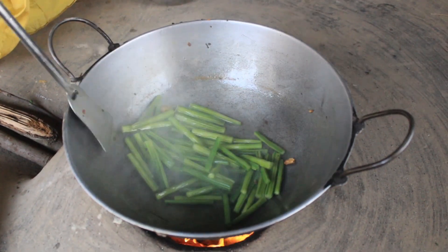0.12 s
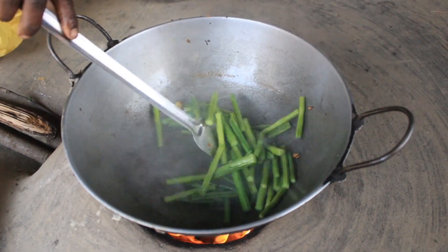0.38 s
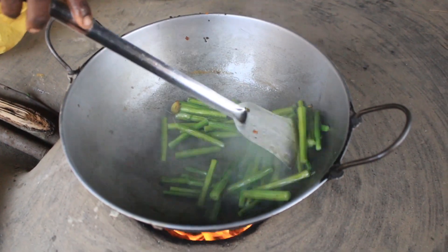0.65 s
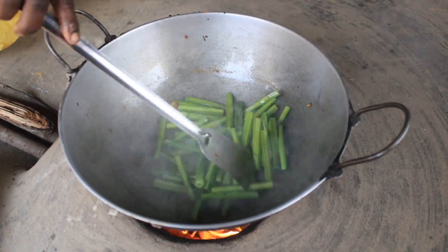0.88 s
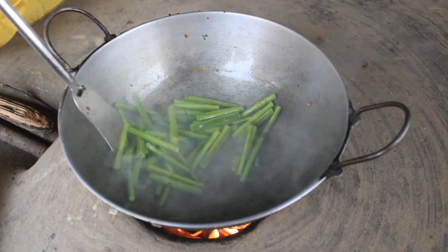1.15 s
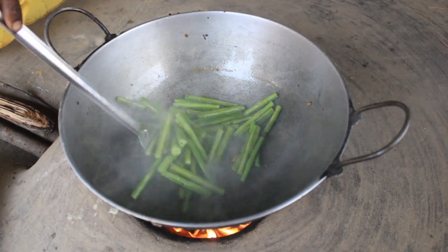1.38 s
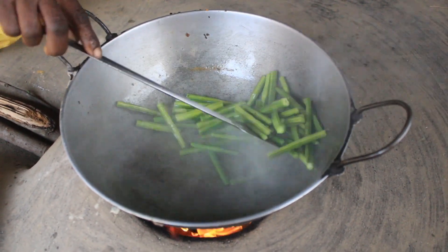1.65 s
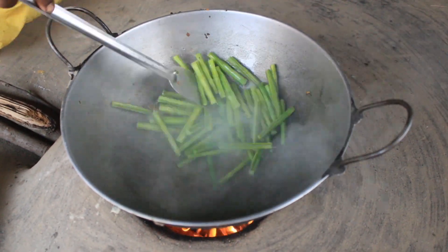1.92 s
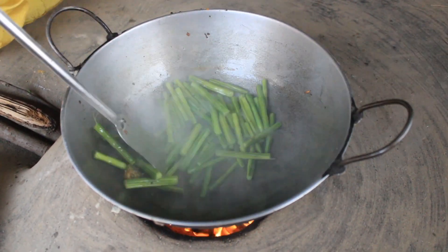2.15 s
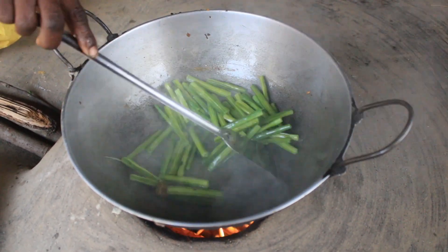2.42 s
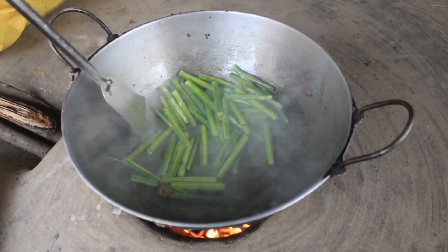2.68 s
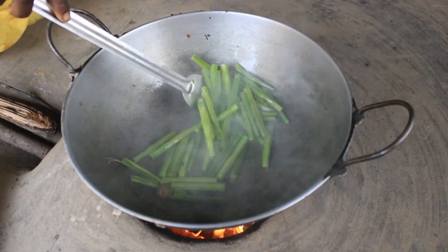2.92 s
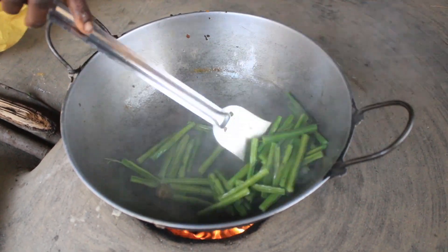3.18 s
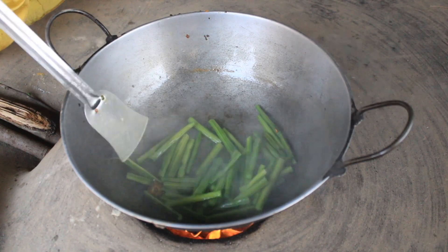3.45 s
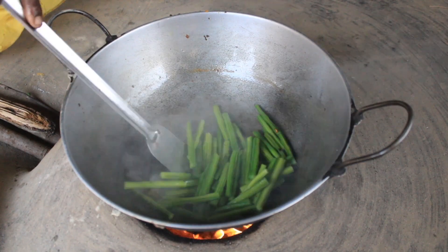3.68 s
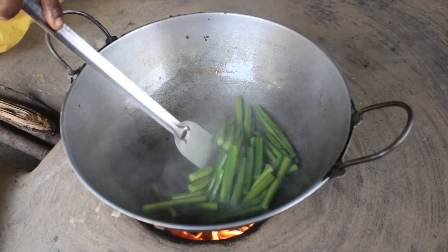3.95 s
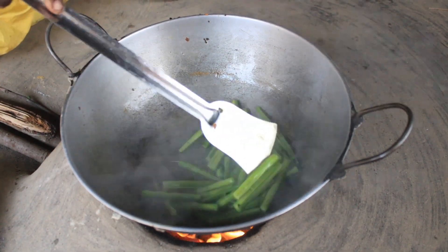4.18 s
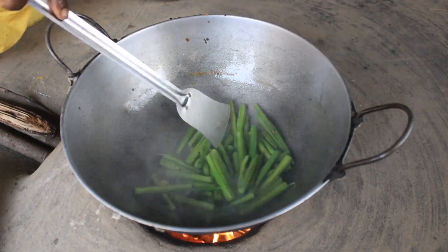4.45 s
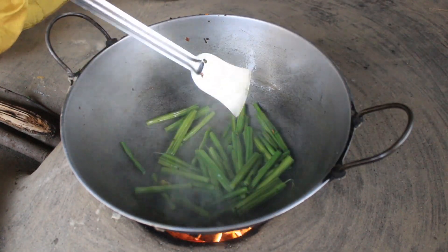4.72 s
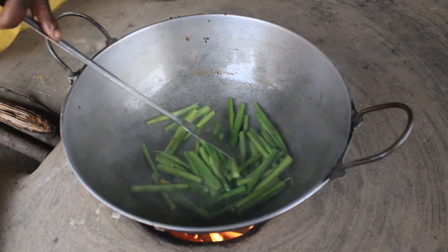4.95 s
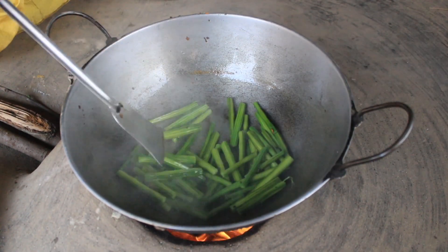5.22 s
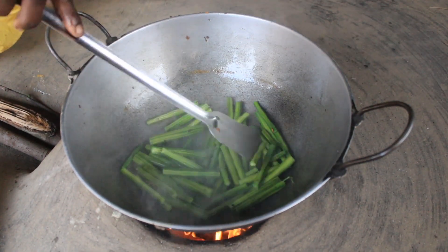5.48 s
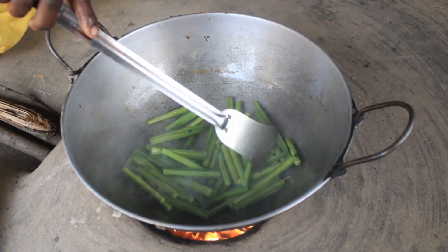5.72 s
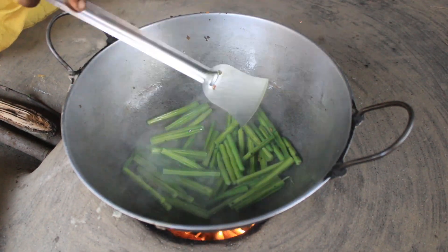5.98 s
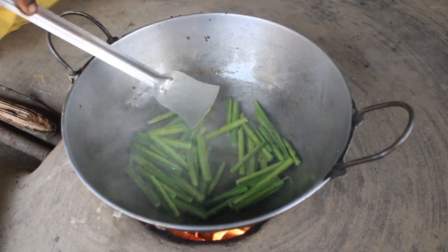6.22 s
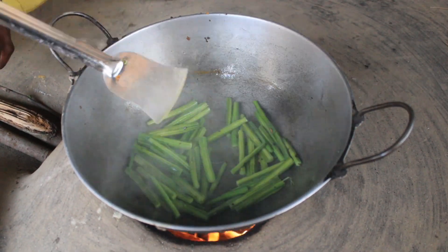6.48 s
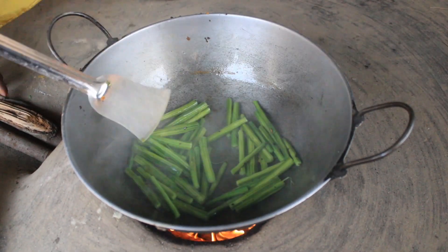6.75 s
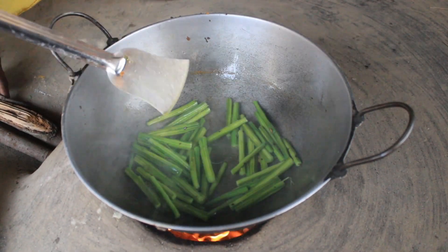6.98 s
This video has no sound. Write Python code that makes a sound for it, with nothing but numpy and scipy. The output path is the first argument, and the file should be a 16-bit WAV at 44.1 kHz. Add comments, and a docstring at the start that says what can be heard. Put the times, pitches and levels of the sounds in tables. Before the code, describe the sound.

Steady, bright frying hiss with sharp snaps and spits, broken by metallic spatula clinks and soft knocks, above faint flames and a distant engine hum.

```python
"""Wet vegetables sizzle in a deep steel pan over a wood fire; a steel spatula turns them, clinking and knocking.
The sizzle is thousands of random steam bursts plus hiss, split by bubble size and coloured by the bowl of the pan.
Single snaps are short pressure pulses; knocks and clinks ring decaying steel modes.
The fire is lumpy low noise, a far engine two unsteady sines; one microphone feeds both channels."""
import sys
import numpy as np
from scipy import signal
from scipy.fft import rfft, irfft
from scipy.io import wavfile

SR = 44100
rng = np.random.default_rng(int(sys.argv[2]) if len(sys.argv) > 2 else 0)


def wav_record(signal):
    """Record a signal, one row per channel, as 16-bit PCM in the file named by sys.argv[1]."""
    frames = np.transpose(np.atleast_2d(signal))
    bounded = np.clip(frames, -1, 1)
    # unit amplitude maps onto the largest positive 16-bit level
    quanta = np.round(bounded * 32767).astype(np.int16)
    wavfile.write(sys.argv[1], SR, quanta)


def magnitude_from_level(level_db):
    """Linear magnitude for a level in decibels (20 dB per decade)."""
    exponent = np.asarray(level_db, float) / 20
    return 10 ** exponent


N = 313992


def in_time(rows):
    """Columns of a curve table, interpolated at every sample."""
    s, *columns = np.transpose(rows)
    return [np.interp(np.arange(N) / SR, s, column) for column in columns]


def rms_one(x):
    """Scale to rms 1."""
    return x / np.sqrt(np.mean(x ** 2) + 1e-20)


def drift(corner_hz):
    """Slow random curve of rms 1: noise through a double one-pole low-pass."""
    hop, settle = 20, 4000   # samples per step, steps
    r = np.exp(-2 * np.pi * corner_hz * hop / SR)
    noise = rng.standard_normal(N // hop + settle + 2)
    slow = signal.lfilter([1], [1, -2 * r, r * r], noise)[settle:]
    return np.interp(np.arange(N) / hop, np.arange(len(slow)), rms_one(slow))


def colour(x, spectrum, bumps=(), size=8192):
    """Causal minimum-phase filter from a smooth spectrum plus bell-shaped peaks and dips."""
    hz = np.maximum(np.arange(size // 2 + 1) * SR / size, 1)
    knots_hz, knots_db = np.transpose(spectrum)
    db = np.interp(np.log(hz), np.log(knots_hz), knots_db)
    for centre_hz, width_hz, bump_db in bumps:
        db = db + bump_db / (1 + (2 * (hz - centre_hz) / width_hz) ** 2)
    # folding the cepstrum makes the phase minimum
    cepstrum = irfft(np.log(magnitude_from_level(db)))
    cepstrum[1:size // 2] *= 2
    cepstrum[size // 2 + 1:] = 0
    impulse = irfft(np.exp(rfft(cepstrum)))
    return signal.fftconvolve(x, impulse)[:N]


def sizzle():
    """Bursts shared by all bubble sizes, bursts of each size alone, and steam hiss; each size swells on its own."""
    # Edges of the bubble-size bands [Hz].
    edges_hz = [100, 750, 1500, 2300, 3300, 4600, 6400, 9400, 12500, 19000]
    # Colour of the bubbles. Each row: frequency in Hz, relative level per Hz in dB.
    bubble_colour = [(240, -40.5), (400, -19.5), (595, -10.5), (704, -15.5), (927, -15.5), (1360, -11.5),
                     (2050, -6.5), (2390, -6.5), (2620, -4), (3400, -5), (7300, 1), (10700, -3),
                     (15400, -21)]
    # Resonances and notches of the bowl. Each row: centre in Hz, width in Hz, gain in dB.
    bowl_bumps = [(610, 310, 3.5), (708, 34.4, -13), (856, 15, 5.5), (910, 90, -4), (1093, 72, 2.5),
                  (1230, 58, -5), (1378, 106, 6), (1470, 51, -7.5), (1563, 64, 5), (1700, 96, 0),
                  (2090, 310, 4), (2477, 93, -6.5), (2574, 38, 7), (4340, 270, 2.5)]
    large_follows, fine_follows = 0.75, 0.94   # share of each dB swell taken by large bubbles, fine spray
    rest_db, swell_db, large_db, fine_db = frying()
    large_db = large_db - (1 - large_follows) * swell_db
    fine_db = fine_db - (1 - fine_follows) * swell_db
    shared = bursts(per_s=9000, spread_db=4.5, clump_db=2.5)
    out = 0
    for low_hz, high_hz in zip(edges_hz, edges_hz[1:]):
        if high_hz < 3350:
            share_db = large_db
        elif low_hz > 9300:
            share_db = fine_db
        else:
            share_db = 0
        # small bubbles are more numerous
        own = magnitude_from_level(2.0) * bursts(per_s=1.1 * high_hz, spread_db=3.5, clump_db=1.75)
        hiss = magnitude_from_level(0.5) * rng.standard_normal(N)
        patch_db = 0.46 * drift(5.1) + 0.62 * drift(21)
        band = signal.butter(3, [low_hz, high_hz], "band", fs=SR, output="sos")
        gain = magnitude_from_level(share_db - np.mean(share_db) + patch_db)
        out = out + gain * signal.sosfilt(band, shared + own + hiss)
    pan = rms_one(colour(out, bubble_colour, bowl_bumps))
    return magnitude_from_level(rest_db + swell_db + 0.5) * pan


def bursts(per_s, spread_db, clump_db):
    """Clicks of random sign and uneven size that come in clumps; rms 1. per_s is the rate at zero drift."""
    signs = rng.choice([-1, 1], N)
    sizes = magnitude_from_level(spread_db * np.minimum(rng.exponential(1, N), 4.5)) * signs
    rate_per_s = per_s * magnitude_from_level(clump_db * (drift(25) + drift(150)))
    born = rng.random(N) < rate_per_s / SR
    return rms_one(sizes * born)


def frying():
    """Rest level, swell from stirring and spitting, shares of large bubbles and fine spray, in dB."""
    # Juice running out of the pieces. Each row: time in seconds, sizzle at rest in dB before later gains,
    # relative share of large bubbles in dB, relative share of fine spray in dB.
    juice_curve = [(0, -26, 0, 0.5), (.3, -28, -0.5, -1.5), (.65, -25, 3.5, 0.5), (1.2, -25.5, -0.5, -1),
                   (1.55, -26, 2, -2), (1.9, -26.5, 0, -0.5), (2.4, -26, -0.5, -1.5),
                   (2.75, -27, -0.5, -0.5), (3.1, -25.5, 1, -.5), (3.6, -25.5, 0, 0.5), (3.9, -25, 1.5, -1),
                   (4.7, -24, 0.5, 1.5), (5.2, -25.5, 1, 0.5), (5.7, -24, 0.5, 2), (6.4, -24.5, -1.5, 0.5),
                   (7.12, -28, 0.5, 1)]
    # Spatula pushes wet faces on to hot steel. Each row: peak in seconds, dB over rest, rise in s, fall in s.
    push_rows = [(.34, 4.5, 0.12, 0.24), (.94, 5.5, 0.45, 0.032), (1.21, 5, 0.29, 0.22),
                 (1.58, 2, 0.32, 0.12), (2.0, 3.5, 0.28, 0.38), (2.85, 5, .35, 0.13),
                 (3.04, 2.5, .05, 0.17), (3.35, 3, 0.39, .16), (3.61, 2, 0.083, .04),
                 (4.16, 3.5, 0.58, 0.07), (4.34, 3, 0.1, 0.18), (4.6, 2.5, .14, .16), (5.09, 5, 0.46, 0.38),
                 (5.89, 4.5, 0.23, 0.31), (6.31, 4, 0.69, .1), (6.66, 4, .12, 0.031),
                 (6.86, 4.5, 0.19, 0.11), (7.1, 3.5, 0.093, 0.044)]
    # Short spits of steam. Each row: peak in seconds, dB over the sizzle.
    spit_rows = [(.12, 0.5), (.5, 3), (.78, 1.5), (.95, 2), (1.13, 1), (1.31, 1.5), (1.63, 2.5),
                 (1.92, 2.5), (2.02, 3), (2.31, 7.5), (2.85, 0.5), (2.965, 5), (3.02, 1.5), (3.725, 5),
                 (4.39, 2), (5.1, 2.5), (6.46, 3.5), (6.91, 1)]
    rest_db, large_db, fine_db = in_time(juice_curve)
    pushes_db = np.max([db * tent(s, rise_s, fall_s) for s, db, rise_s, fall_s in push_rows], axis=0)
    spits_db = sum(db * tent(s, rise_s=0.029, fall_s=0.021) for s, db in spit_rows)
    return rest_db, pushes_db + spits_db, large_db, fine_db


def tent(s, rise_s, fall_s):
    """Straight up to 1 at s and straight down again."""
    return np.interp(np.arange(N) / SR, [s - rise_s, s, s + fall_s], [0, 1, 0])


def crackle():
    """Lone snaps that stand out of the sizzle, in clumps, louder where the oil is busier."""
    # Pitches of the lone snaps [Hz].
    pitches_hz = [4400, 5100, 5700, 6300, 6800, 7300, 7800, 8400]
    rest_db, swell_db, _, _ = frying()
    rate_per_s = 900 * magnitude_from_level(5 * drift(20))
    born = rng.random(N) < rate_per_s / SR
    spread_db = 3.5 * np.minimum(rng.exponential(1, N), 2.5)
    sizes = born * magnitude_from_level(rest_db + swell_db + 3.5 + spread_db)
    dealt = rng.integers(0, len(pitches_hz), N)
    return sum(np.convolve(sizes * (dealt == k), snap(hz))[:N] for k, hz in enumerate(pitches_hz))


def pops():
    """The biggest bubbles snap and throw a short spatter of noise after them."""
    # Loudest single bursts. Each row: time in seconds, peak in dB before the low-pass, pitch in Hz.
    pop_rows = [(0.1153, -3, 7120), (0.492, -7, 4210), (0.7757, -4, 7480), (0.9441, -1, 7300),
                (1.2255, -4, 6260), (1.3134, -3, 6800), (1.3839, -6, 7080), (1.6273, -2, 7830),
                (1.8345, -6, 6970), (1.9176, -3, 7140), (2.0155, -3, 8960), (2.0297, -4, 7200),
                (2.1388, -4, 5560), (2.2326, -6, 7220), (2.442, -6, 5060), (2.8607, -1, 6590),
                (3.0215, -5, 7520), (3.3204, -6, 6330), (3.3624, -4, 6240), (3.4286, -6, 2800),
                (3.6034, -6, 7170), (3.6219, -6, 7280), (3.7229, -3, 5500), (3.7956, -9, 2500),
                (3.8935, -7, 4950), (4.0968, -5, 6720), (4.1667, -3, 6470), (4.2399, -10, 3870),
                (4.3915, -2, 5440), (4.4415, -4, 5880), (4.5859, -5, 6900), (4.6587, -5, 4940),
                (4.9195, -9, 3580), (4.9753, -3, 8960), (5.1074, -3, 7290), (5.2312, -4, 6720),
                (5.3156, -8, 3010), (5.3299, -6, 5180), (5.5086, -9, 3720), (5.7806, -7, 3000),
                (5.9426, -7, 4300), (6.1851, -4, 5340), (6.309, -5, 7300), (6.3305, -5, 7860),
                (6.6477, -4, 5850), (6.6687, -4, 8130), (6.8647, -4, 6540), (6.9067, -2, 5430)]
    size = 400
    out, t = np.zeros(N + size), np.arange(size) / SR
    spatter = np.diff(rng.standard_normal((len(pop_rows), size + 1)), axis=1)
    for (s, db, hz), noise in zip(pop_rows, spatter):
        after_suck = t * hz > 1.3
        tail = magnitude_from_level(-21) * noise * np.exp(-t / .002) * after_suck
        at = round((s - 1.3 / hz) * SR)   # the suck falls on s
        out[at:at + size] += magnitude_from_level(db) * (snap(hz, size) + tail)
    return signal.sosfilt(signal.butter(4, 12000, fs=SR, output="sos"), out[:N])


def snap(hz, size=120):
    """Pressure of a bursting bubble: a push, a deep suck of height 1, a smaller rebound."""
    cycles = np.arange(size) * hz / SR - 1.3   # 0 at the suck
    return -np.cos(2 * np.pi * cycles) * np.exp(-((cycles + .04) / .68) ** 2)


def knocks():
    """Each contact rings the modes near its own pitch: soft pieces thud low, the blade's edge clinks high."""
    # Modes of pan and spatula. Each row: frequency in Hz, relative level in dB, t60 in seconds.
    steel_modes = [(175, -12.5, .2), (218, -0.5, 0.12), (268, -11.5, 0.039), (326, -8, 0.09),
                   (420, -6.5, 0.038), (520, -8, 0.072), (607, -3, 0.036), (760, -10.5, 0.037),
                   (876, -8, 0.051), (1096, -7.5, 0.042), (1320, -5, 0.052), (1630, -4, 0.06),
                   (2056, 0.5, 0.066), (2243, -7.5, 0.075), (2550, -4, 0.096), (2800, -2, 0.11),
                   (3100, -2, 0.1), (3565, -6, 0.049), (3840, -5, 0.075), (4370, -11.5, 0.11),
                   (4750, -13, 0.097), (5130, -4.5, 0.09), (5520, -1, 0.03), (5330, -6.5, 0.063),
                   (7500, 16, 0.049), (8700, -25, .045)]
    s, db, middle_hz, octaves = contacts()
    chance_db = 2.0 * rng.standard_normal((len(s), len(steel_modes)))
    out = np.zeros(N)
    for k, (hz, mode_db, t60_s) in enumerate(steel_modes):
        clicks = np.zeros(N)
        away = np.log2(hz / middle_hz) / octaves
        strength = magnitude_from_level(db + mode_db - 6 * away ** 2 + chance_db[:, k])
        np.add.at(clicks, np.round(s * SR).astype(int), strength)
        contact_s = .002 + 2.2 / hz   # the ring builds up while the contact lasts
        push = ring(clicks, hz, contact_s) * 2 * np.log(1000) / (contact_s * SR)
        out += (-1) ** k * ring(push, hz, t60_s)
    return out


def ring(clicks, hz, t60_s):
    """Two-pole resonator: a unit click starts a decaying sine of initial height 1."""
    r, w = magnitude_from_level(-60 / (t60_s * SR)), 2 * np.pi * hz / SR
    return signal.lfilter([0, np.sin(w)], [1, -2 * r * np.cos(w), r * r], clicks + 1e-18)


def contacts():
    """Columns s, dB, middle Hz, octaves: a clink is pitch, overtone and thud; a tumble is many faint taps."""
    # Pieces and blade knock on the pan. Each row: time in seconds, drive in dB,
    # middle of the modes set ringing in Hz, spread in octaves (6 dB down).
    knock_rows = [(.33, -33.5, 190, .3), (.491, -23, 3100, 0.18), (.615, -29, 350, 0.97),
                  (1.309, -28.5, 1250, 0.99), (2.014, -35, 910, .77), (2.181, -31, 1207, 1.2),
                  (2.926, -20.5, 3200, 0.21), (2.935, -17, 5200, .3), (2.947, -22, 5300, .3),
                  (3.015, -25.5, 2800, 1.1), (3.302, -29, 553, 0.7), (3.36, -28, 186, 0.2),
                  (3.428, -26, 1000, 0.92), (3.549, -31, 2200, .68), (3.727, -19, 3900, .25),
                  (3.752, -20, 3700, 0.27), (3.795, -29, 1500, 1.5), (3.807, -29, 2500, .4),
                  (3.853, -27, 2400, .6), (3.915, -23.5, 1700, .9), (4.002, -23.5, 615, 0.45),
                  (4.17, -27, 570, .4), (4.173, -31, 263, 0.55), (4.2455, -23.5, 580, 0.66),
                  (4.248, -22, 317, .25), (4.31, -25, 420, 0.32), (4.325, -29.5, 220, .4),
                  (4.345, -33, 702, 0.82), (4.38, -34, 450, 0.89), (4.99, -30, 500, .7),
                  (5.507, -29, 1800, 1.05), (5.724, -31, 200, .4), (6.089, -25, 218, 0.21),
                  (6.301, -29, 2100, 0.54), (6.648, -26.5, 1200, 1.3), (6.71, -31, 902, 0.83),
                  (6.904, -31, 2290, 0.48), (7.063, -33, 1600, 1.2)]
    # Blade's edge clinks on the steel. Each row: time in seconds, drive in dB, pitch in Hz,
    # overtone drive in dB, drive of the pan's thud in dB.
    clink_rows = [(.374, -14.5, 2300, -34, -42), (1.296, -24, 2750, -20.5, -45),
                  (2.304, -11, 2590, -11.5, -25.5), (2.96, -21, 2730, -15.5, -24.5),
                  (3.72, -30, 2580, -15, -27), (5.78, -19, 2300, -23, -30), (5.9423, -15, 2245, -28, -45)]
    # Pieces tumble over the steel. Each row: start in seconds, end in seconds, drive of each tap in dB.
    tumble_rows = [(.45, .95, -38.5), (1.699, 2.251, -41.5), (2.853, 3.399, -32), (3.721, 4.421, -33),
                   (4.851, 5.35, -35.5), (5.701, 6.299, -36.5)]
    rows = list(knock_rows)
    for s, db, hz, overtone_db, thud_db in clink_rows:
        rows += [(s, db, hz, 0.12), (s, overtone_db, 1.96 * hz, 0.29), (s, thud_db, 370, 0.61)]
    low_hz, high_hz, taps_per_tumble = 302, 4000, 24
    for start_s, end_s, db in tumble_rows:
        for when, pitch in rng.random((taps_per_tumble, 2)):
            middle_hz = low_hz * (high_hz / low_hz) ** pitch
            rows.append((start_s + (end_s - start_s) * when, db, middle_hz, 0.69))
    return np.transpose(rows)


def fire():
    """Low flutter of the flames: coloured noise with a lumpy random level."""
    # Draught through the fire. Each row: time in seconds, level in dB before the 2 dB gain below.
    draught = [(0, -55), (.44, -47.5), (1.15, -50.5), (1.88, -46.5), (2.25, -53), (2.91, -46),
               (3.51, -52.5), (3.75, -49), (4.2, -40.5), (4.72, -50.5), (5.0, -48), (5.71, -50),
               (6.11, -44), (6.39, -53), (6.76, -51.5), (7.12, -47)]
    # Colour of the flames. Each row: frequency in Hz, relative level in dB.
    flame_colour = [(20, -12), (45, -9), (80, -6), (180, 2), (250, -4), (320, -2), (450, -15.5),
                    (900, -21.5), (3000, -48)]
    level_db, = in_time(draught)
    flames = colour(rng.standard_normal(N) * magnitude_from_level(3.6 * drift(4.3)), flame_colour)
    return magnitude_from_level(level_db + 2.0) * rms_one(flames)


def engine():
    """Two low orders of a far engine, sines at the firing rate and half of it, swelling, fading, unsteady."""
    # The engine's speed. Each row: time in seconds, mean firing rate in Hz.
    speed = [(0, 137), (.55, 136.5), (.8, 139), (1.1, 134.5), (2.6, 134), (3.15, 138), (3.25, 135),
             (3.6, 138.5), (4.3, 136.5), (4.55, 133.5), (5.2, 134.5), (6.3, 133.5), (6.66, 137),
             (7.12, 133.5)]
    firing_hz, = in_time(speed)
    phase = 2 * np.pi * np.cumsum(firing_hz * (1 + 0.0075 * drift(8.9))) / SR
    return np.sqrt(2) * (hum(order=1) * np.sin(phase) + hum(order=.5) * np.sin(phase / 2))


def hum(order):
    """Rms gain of one order as it comes and goes on the air: the loudest swell at each moment, wavering."""
    # Swells of the hum. Each row: peak in seconds, order, peak in dB before wavering, half length in seconds.
    swell_rows = [(.5, 1, -47, 0.34), (.83, 1, -49, .12), (1.22, 1, -45.5, 0.17), (2.0, 1, -54, .3),
                  (2.77, 1, -43, 0.089), (3.3, 1, -47.5, 0.14), (3.71, 1, -51.5, .1), (3.95, 1, -48, .12),
                  (4.29, 1, -39, 0.082), (4.6, 1, -45, 0.069), (4.856, 1, -45.5, 0.24),
                  (5.25, 1, -45, 0.35), (5.8, 1, -49, 0.76), (6.4, 1, -48.5, .4), (7.05, 1, -50, 0.37),
                  (.35, .5, -51, .4), (0.672, .5, -47, .08), (1.6, .5, -51.5, .35), (2.28, .5, -53, .15),
                  (2.78, .5, -55, .15), (3.25, .5, -54, .1), (3.79, .5, -52, .1), (4.06, .5, -48, .12),
                  (4.72, .5, -53, 0.2), (5.49, .5, -51, .15), (6.09, .5, -48, .14), (6.66, .5, -51.5, .3)]
    edge_db, rest_db = 8.5, -66   # loss at half a length from the peak; floor between swells
    t = np.arange(0, N, 64) / SR
    swells_db = [db - edge_db * np.abs(t - s) / half_s for s, k, db, half_s in swell_rows if k == order]
    level_db = np.maximum(np.max(swells_db, axis=0), rest_db)
    return magnitude_from_level(np.interp(np.arange(N) / SR, t, level_db) + 1.3 * drift(7.8))


def scene():
    """One microphone feeds both channels."""
    mono = sizzle() + crackle() + pops() + knocks() + fire() + engine()
    return np.array([mono, mono])


def top_cut(x):
    """Nothing passes above the cut-off."""
    return signal.sosfilt(signal.butter(12, 15600, fs=SR, output="sos"), x)


def record(dry):
    """Deliver the finished mix."""
    return top_cut(dry)


dry = scene()
out = record(dry)
wav_record(out)
```